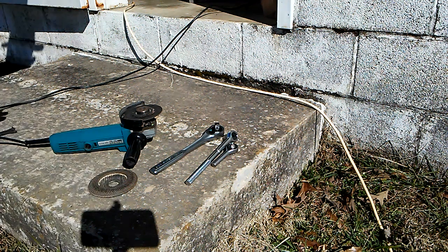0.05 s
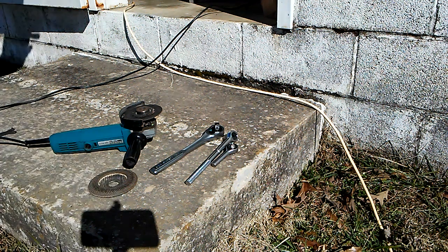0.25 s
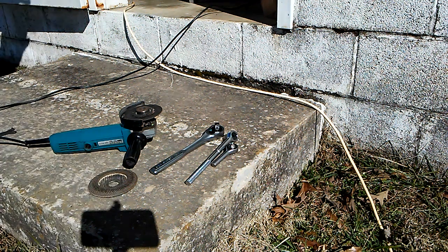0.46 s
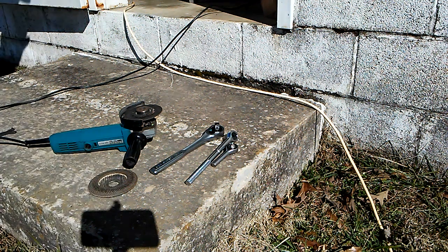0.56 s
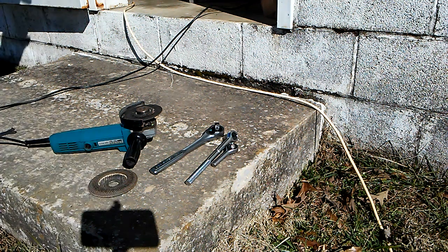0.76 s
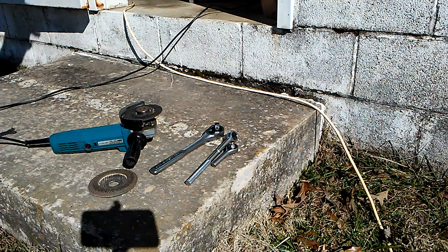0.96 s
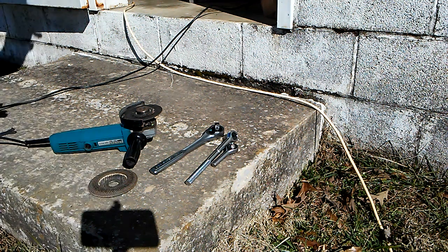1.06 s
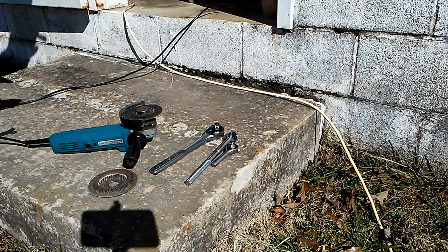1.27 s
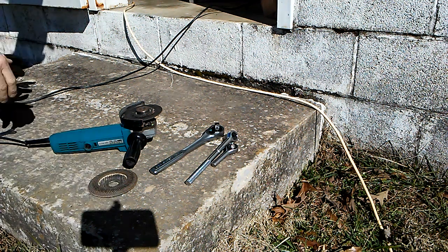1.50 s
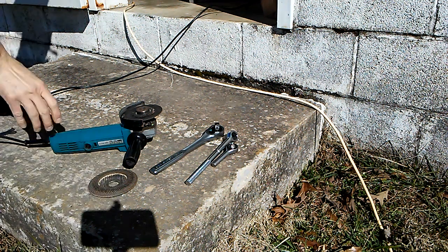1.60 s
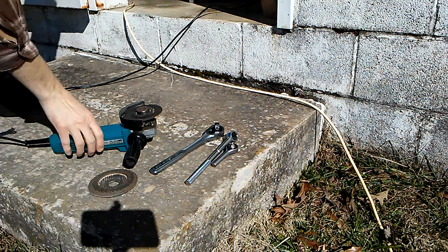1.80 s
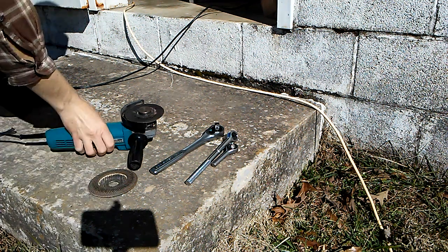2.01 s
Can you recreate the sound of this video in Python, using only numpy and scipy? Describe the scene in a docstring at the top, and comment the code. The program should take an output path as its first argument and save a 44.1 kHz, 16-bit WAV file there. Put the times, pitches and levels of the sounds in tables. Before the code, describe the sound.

Steel wrenches clink together in a quick, bright cluster close to the microphone, and one socket rings on with a thin high tone. Two soft steps crunch dry grass, then a short double scuff follows in quiet outdoor air.

```python
"""Steel wrenches clink together close by, and one socket rings on for over a second.
Each hit is a sharp crack plus the pure tones at which the steel vibrates. Two steps follow, snapping
dry grass with low thumps, then a short double scuff, all over quiet outdoor air.
The microphone is weak near 5 kHz. The treble cuts in and out at set times."""
import sys
import numpy as np
from scipy import signal
from scipy.fft import rfft, irfft
from scipy.io import wavfile
from scipy.ndimage import uniform_filter1d

SR = 44100
rng = np.random.default_rng(int(sys.argv[2]) if len(sys.argv) > 2 else 0)


def generate_wav(sig):
    """Save sig (samples, or channels by samples) to the path in sys.argv[1] as 16-bit PCM at SR."""
    pcm = np.round(np.clip(np.atleast_2d(sig).T, -1, 1) * 32767).astype(np.int16)
    wavfile.write(sys.argv[1], SR, pcm)


N = 90404
T = np.arange(N) / SR


def gain_of(db):
    """Turns decibels into a multiplier."""
    return 10 ** (np.asarray(db) / 20)


def evened(x):
    """Scales a signal to an average (rms) size of 1."""
    return x / np.sqrt(np.mean(x ** 2) + 1e-20)


def colour(x, spectrum):
    """Gives x the balance of lows and highs in a table, at an average size of 1."""
    hz = np.fft.rfftfreq(len(x), 1 / SR) + 1
    table_hz, db = np.transpose(spectrum)
    gain = gain_of(np.interp(np.log(hz), np.log(table_hz), db, -90, -90))
    return evened(irfft(rfft(x) * gain, len(x)))


def noise(spectrum):
    """Steady noise, coloured by a table."""
    return colour(rng.standard_normal(N), spectrum)


def wobble(samples):
    """Random drift, smooth over this many samples."""
    return evened(uniform_filter1d(uniform_filter1d(rng.standard_normal(N), samples), samples))


def bursts(hits, fade_s, spectrum):
    """Noise that jumps up at each hit, then falls 60 dB in fade_s."""
    power = np.zeros(N)
    for start, db in hits:
        age = np.maximum(T - start, 0)
        rise = np.minimum(age / .00079, 1)
        power += (rise * gain_of(db - 60 * age / fade_s)) ** 2
    return np.sqrt(power) * noise(spectrum)


def ring(times, db, fade_s, hz, slip):
    """A tone that each hit restarts at its own level, shifted at random by about slip cycles."""
    last_hit = np.maximum(np.searchsorted(times, T) - 1, 0)
    age = np.maximum(T - times[last_hit], 0)
    level = (T >= times[0]) * gain_of(db[last_hit] - 60 * age / fade_s)
    shift = np.cumsum(slip * rng.standard_normal(30))[last_hit]
    lag = np.exp(-1 / (.0014 * SR))  # smooths each jump over 1.4 ms
    envelope = signal.lfilter([1 - lag], [1, -lag], level * np.exp(2j * np.pi * shift))
    tone = np.exp(2j * np.pi * np.cumsum(hz * np.ones(N)) / SR)
    return np.sqrt(2) * (envelope * tone).real


# Colours of the air's soft rush, hiss and rumble (frequency [Hz], relative level [dB])
RUSH_COLOUR = [(120, -23.5), (180, -2.5), (350, -8.5), (1300, -13.5), (2200, -16.5), (3800, -17.5),
               (4400, -21)]
HISS_COLOUR = [(4400, -15), (6000, -7.5), (9000, 0), (16000, -14)]
RUMBLE_COLOUR = [(22, -46.5), (45, -1), (95, -8.5), (120, -17.5), (200, -25.5)]
# How loud the rush is (time [s], level [dB])
RUSH_LEVELS = [(0, -53.5), (.06, -61.5), (.12, -51.5), (.4, -54), (.45, -62.5), (.6, -57.5), (.93, -55),
               (.97, -61), (1.01, -55), (1.08, -61), (1.2, -56), (1.46, -54), (1.49, -59.5), (1.55, -57.5),
               (2.05, -58)]
def air():
    """Quiet outdoor air: a flickering rush, a high hiss and a low rumble."""
    level_db = np.interp(T, *np.transpose(RUSH_LEVELS)) + 1.57 * wobble(400)
    rush = gain_of(level_db) * noise(RUSH_COLOUR)
    return rush + gain_of(-64) * noise(HISS_COLOUR) + gain_of(-66) * noise(RUMBLE_COLOUR)


# Background tones (pitch [Hz], level [dB])
HUM_TONES = [(59, -66.5), (176, -66), (206, -68.5)]
def hum():
    """Faint low tones that waver in pitch and loudness."""
    out = np.zeros(N)
    for hz, db in HUM_TONES:
        level = gain_of(db + 2.4 * wobble(2500))
        pitch = hz * (1 + .0173 * wobble(4000))
        out += level * np.sin(2 * np.pi * np.cumsum(pitch) / SR)
    return out


# Low thumps (middle time [s], length [s], pitch [Hz], level [dB])
LOW_THUMPS = [(0.566, 0.12, 83.5, -56), (0.683, 0.043, 71, -45.5), (.755, 0.1, 81.6, -47.5),
              (.86, 0.04, 81, -46), (1.005, 0.025, 75, -52), (1.38, 0.059, 68, -52.5),
              (1.435, 0.059, 64, -48.5), (1.553, 0.042, 63, -54.5), (1.973, 0.055, 65, -55)]
# Colour of their puff of air (frequency [Hz], relative level [dB])
PUFF_COLOUR = [(110, -5), (170, -5.5), (500, -17.5)]
def thumps():
    """Footfalls and gusts: a brief low tone, a weaker one an octave up and a puff of air."""
    puff, out = noise(PUFF_COLOUR), np.zeros(N)
    for middle, length, hz, db in LOW_THUMPS:
        phase = 2 * np.pi * (hz * (T - middle) + rng.random())
        body = np.sin(phase) + gain_of(-13.5) * np.sin(2 * phase) + gain_of(-7.5) * puff
        swell = np.exp(-8 * ((T - middle) / length) ** 2)
        out += np.sqrt(2) * gain_of(db) * swell * body
    return out


def snaps(per_s):
    """Many tiny clicks of uneven size over soft noise."""
    base = rng.standard_normal(N)
    size_db = 3 * np.minimum(rng.exponential(1, N), 5)
    snapping = rng.random(N) < per_s / SR
    return base * (.35 + gain_of(size_db) * snapping)


# Scrapes (start [s], length [s], level [dB])
SCRAPES = [(1.637, 0.024, -47), (1.664, 0.028, -45.5), (1.825, 0.018, -56.5)]
# Their colour (frequency [Hz], relative level [dB])
GRIT_COLOUR = [(250, -31), (500, -0.5), (2500, -3), (4400, -2.5)]
def scuffs():
    """Short gritty scrapes that swell and stop."""
    grit = colour(snaps(per_s=4500), GRIT_COLOUR)
    return sum(gain_of(db) * np.clip(2 * np.minimum(T - start, start + length - T) / length, 0, 1) * grit
               for start, length, db in SCRAPES)


# Steps (start [s], rise [s], fade start [s], fade length [s], level [dB], snaps [per s])
GRASS_STEPS = [(0.719, 0.12, .935, 0.014, -49, 3800), (1.19, 0.074, 1.372, 0.041, -52.5, 1200)]
# Colour of the grass (frequency [Hz], relative level [dB])
GRASS_COLOUR = [(300, -2.5), (1840, -0.5), (3000, -3), (4000, 0), (5500, -20.5), (7200, -3), (8500, -2.5),
                (16000, -24.5)]
def steps():
    """Dry stalks snap under each footfall."""
    out = np.zeros(N)
    for start, rise, fade_start, fade, db, per_s in GRASS_STEPS:
        swell = np.clip(np.minimum((T - start) / rise, 1 + (fade_start - T) / fade), 0, 1)
        out += gain_of(db) * swell * colour(snaps(per_s), GRASS_COLOUR)
    return out


# Low rings (time [s], pitch [Hz], level [dB], time to fade 60 dB [s])
HOLLOW_RINGS = [(0.102, 500, -48, 0.079), (0.113, 775.4, -45.5, 0.16), (1.649, 600, -51, 0.033),
                (1.676, 500, -41.5, 0.022), (1.827, 235, -50.5, 0.064)]
def hollow_rings():
    """Short low rings under the early clinks and the later scuffs."""
    return sum(ring(np.array([start]), np.array([db]), fade_s, hz, slip=0)
               for start, hz, db, fade_s in HOLLOW_RINGS)


# Duller blows (time [s], level [dB])
KNOCK_HITS = [(.105, -36.5), (.119, -26.5), (.196, -41), (.228, -36.5), (.2653, -38.5), (.284, -37),
              (.31, -43.5)]
# Their colour (frequency [Hz], relative level [dB])
KNOCK_COLOUR = [(200, -8), (700, -13.5), (1500, -12.5), (3000, -0.5), (4400, 9)]
def knocks():
    """Duller blows among the clinks, each a burst of noise."""
    return bursts(KNOCK_HITS, fade_s=.03, spectrum=KNOCK_COLOUR)


# Hits on the socket (time [s], level [dB])
SOCKET_STRIKES = [(.108, -53.5), (.194, -38.5), (.228, -37.5), (.262, -41)]
def socket():
    """The struck socket rings with one long, pure tone."""
    times, db = np.transpose(SOCKET_STRIKES)
    return ring(times, db, fade_s=3.13, hz=8314.3, slip=.05)


# Clinks (time [s], crack level [dB], then a ring level [dB] for each part)
# The parts: shank, handle, grip end, short wrench, long wrench, heads, jaws, tips
WRENCH_CLINKS = [(0.0, -59, -51, -39.5, -40.5, -58, -53.5, -52, -62, -75),
                 (.106, -44.5, -46.5, -36, -43.5, -44.5, -50, -59, -63, -73),
                 (0.1228, -46.5, -37, -41, -34.5, -29.5, -36.5, -48, -52.5, -64),
                 (0.164, -48, -60.5, -41.5, -35, -36, -44.5, -49, -47.5, -58.5),
                 (.194, -23, -62.5, -37.5, -36, -39, -35.5, -27.5, -47, -46),
                 (0.208, -33.5, -44, -35.5, -40.5, -43.5, -47, -30, -45.5, -52.5),
                 (0.227, -29, -57, -39.5, -43.5, -43.5, -27.5, -31, -48, -51),
                 (.25, -49, -46, -42, -44, -42, -31.5, -35, -48.5, -62),
                 (0.265, -26, -46.5, -49, -33.5, -43.5, -28, -29.5, -42.5, -56),
                 (0.285, -39.5, -41, -31, -38.5, -37.5, -37, -38, -49, -66),
                 (0.31, -36, -53.5, -35.5, -40.5, -43, -30.5, -39, -47, -64),
                 (0.331, -42, -59, -50.5, -45, -47.5, -33, -38, -52.5, -64)]
# One row per part, listing its tones (pitch [Hz])
PART_PITCHES = [
    [2094],
    [3883],
    [3974, 4090],
    [6123, 6131],
    [6499, 6574],
    [9550, 9543, 9491, 9312, 8941],
    [12008, 12184, 14250],
    [13054, 15467],
]
# How each of those tones rings (added level [dB], time to fade 60 dB [s])
PART_RINGS = [
    [(-1, 0.22)],
    [(1, 0.2)],
    [(0.5, .2), (-10, .25)],
    [(-1, 0.45), (-11, 0.88)],
    [(1.5, .2), (-19, 0.161)],
    [(0.5, 0.17), (-13.5, 0.74), (-3.5, 0.27), (-6.5, 0.11), (-8.5, 0.276)],
    [(3, .3), (-6, 0.47), (-13.5, .22)],
    [(-1, .3), (-4.5, .2)],
]
def wrenches():
    """Every clink sets all the steel parts ringing; the rattle roughens their tones."""
    clinks, out = np.array(WRENCH_CLINKS), np.zeros(N)
    times, part_levels = clinks[:, 0], clinks[:, 2:].T
    swing = 1 + .005 * np.clip((T - .34) / .09, 0, 1)  # pitch lifts as the wrenches swing nearer
    grip = gain_of(-900 * np.maximum(T - .026, 0) * (T < times[1]))  # fingers close on the first ring
    for pitches, rings, levels in zip(PART_PITCHES, PART_RINGS, part_levels):
        for hz, (db, fade_s) in zip(pitches, rings):
            rattle = gain_of(1.6 * wobble(200) * (T < .386))
            damping = grip if hz < 5000 else 1  # fingers mute only the lower tones
            out += rattle * damping * ring(times, levels + db, fade_s, hz * swing, slip=.16)
    return out


# Colour of a steel crack (frequency [Hz], relative level [dB])
CRACK_COLOUR = [(5000, -19), (6500, 6), (9500, 6.5), (11000, -14.5), (16000, -28)]
def cracks():
    """Steel meets steel: a bright crack with a softer tail starts each clink."""
    hits = np.array(WRENCH_CLINKS)[:, :2]
    crack = bursts(hits, fade_s=.023, spectrum=CRACK_COLOUR)
    tail = bursts(hits, fade_s=.1, spectrum=CRACK_COLOUR)
    return crack + gain_of(-9) * tail


def scene():
    """Adds all the sources into one channel."""
    tools = wrenches() + socket() + cracks() + knocks() + hollow_rings()
    return (tools + steps() + thumps() + scuffs() + air() + hum())[None]


# Stretches with full treble (start [s], rise [s], end [s])
TREBLE_SPANS = [(-.1, .003, .0535), (.104, .003, .949), (1.21, .03, 1.378)]
# A bright tick during the scuffs (time [s], level [dB])
SCUFF_TICK = [(1.674, -61)]
# The microphone's dip near 5 kHz (frequency [Hz], gain [dB])
MIC_DIP = [(4050, -0.5), (4350, -19.5), (5200, -9.5), (5900, 1.5)]
# Colour of the circuit hiss (frequency [Hz], relative level [dB])
CIRCUIT_COLOUR = [(4000, -2), (8000, -2.5), (16000, -12.5)]
def record(dry):
    """The treble cuts in and out at set times; then one tick, a dip, faint hiss and a cut at the top."""
    treble_on = sum(np.clip((T - start) / rise, 0, 1) * np.clip((end - T) / .0014, 0, 1)
                    for start, rise, end in TREBLE_SPANS)
    lows = signal.oaconvolve(dry, signal.firwin(255, cutoff=5500, fs=SR)[None], "same")
    treble = (dry - lows) * gain_of(-25 * (1 - treble_on))
    tick = bursts(SCUFF_TICK, fade_s=.024, spectrum=CRACK_COLOUR)
    dip = gain_of(np.interp(np.fft.rfftfreq(N, 1 / SR), *np.transpose(MIC_DIP)))
    dipped = irfft(rfft(lows + treble + tick) * dip, N)
    hiss = gain_of(-78.5) * noise(CIRCUIT_COLOUR)
    top_cut = signal.firwin(1023, cutoff=15780, window=("kaiser", 10), fs=SR)
    return signal.oaconvolve(dipped + hiss, top_cut[None], "same")


dry = scene()
out = record(dry)
generate_wav(out)
```